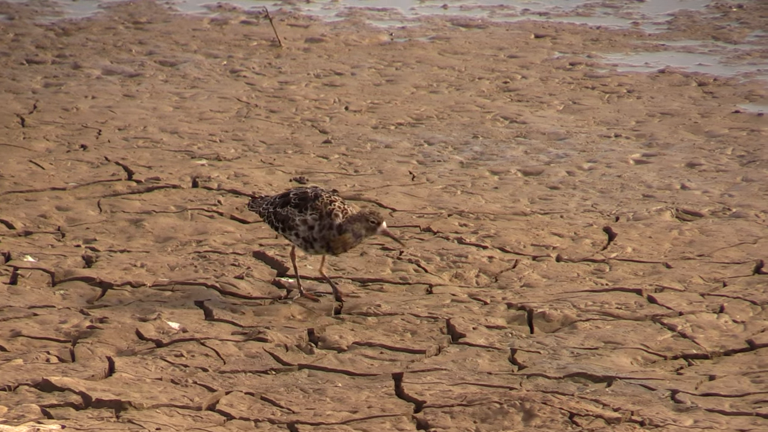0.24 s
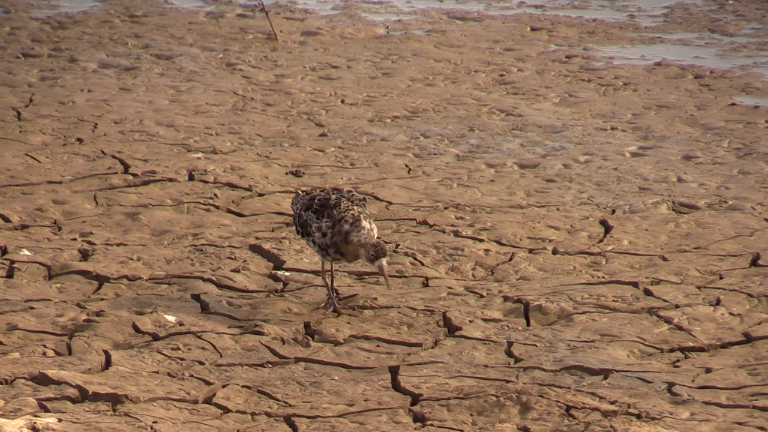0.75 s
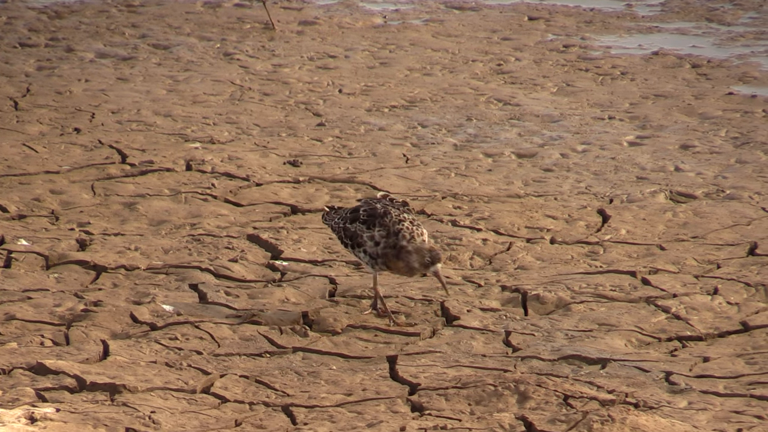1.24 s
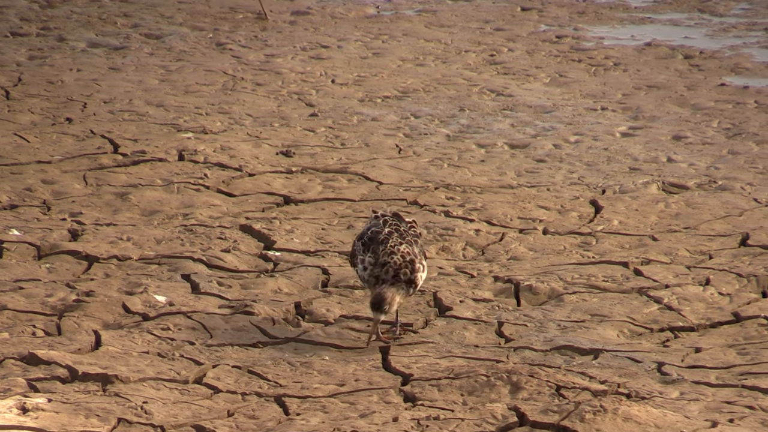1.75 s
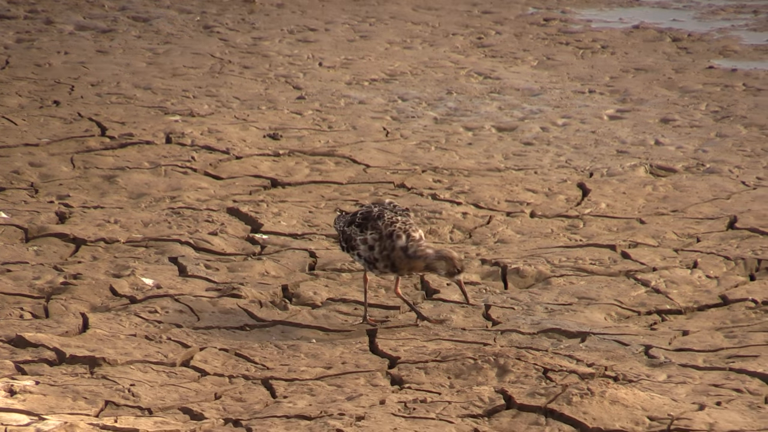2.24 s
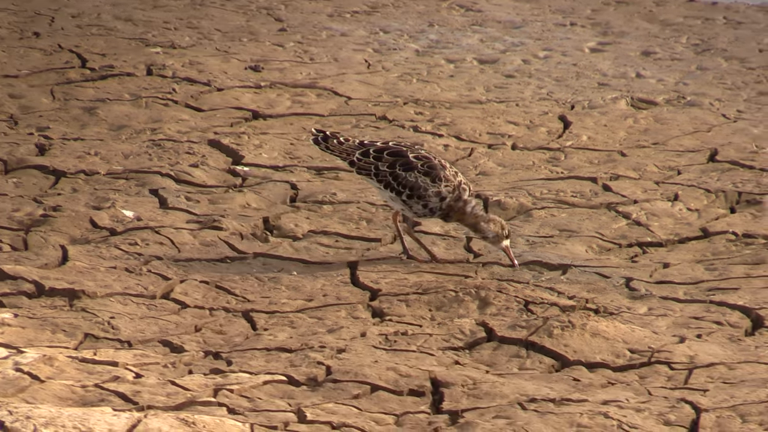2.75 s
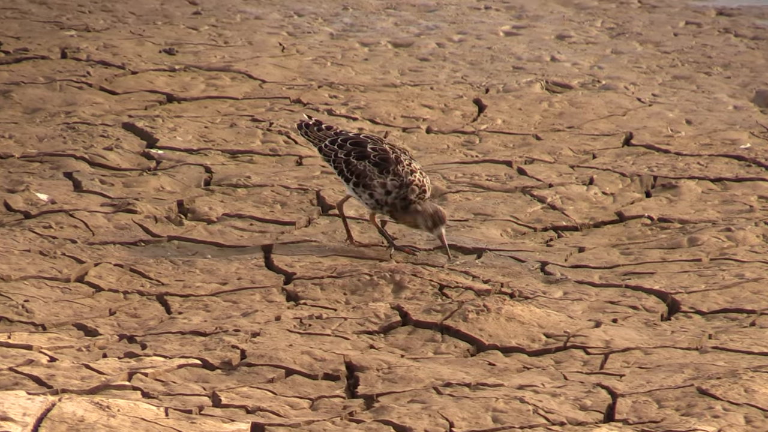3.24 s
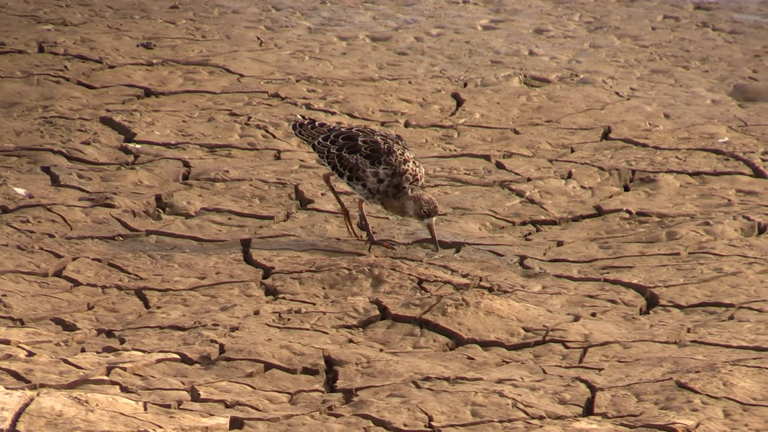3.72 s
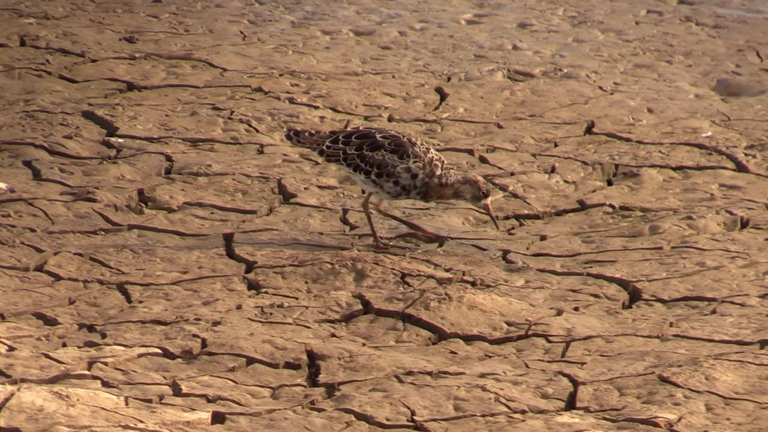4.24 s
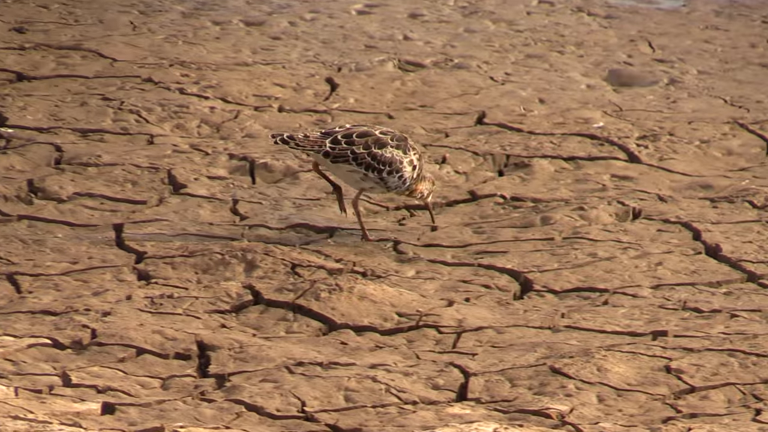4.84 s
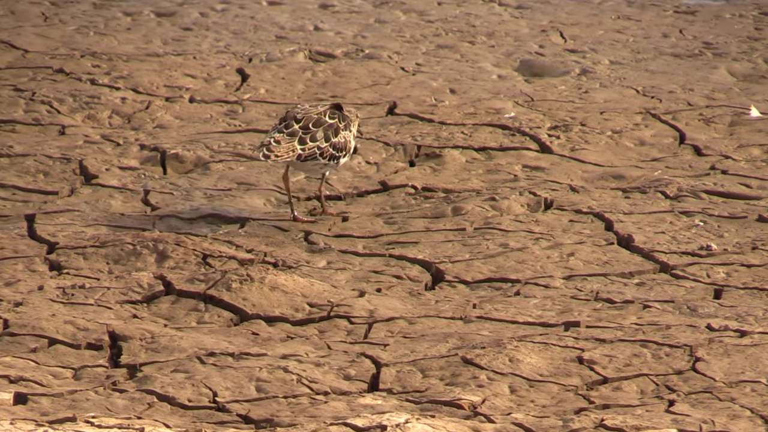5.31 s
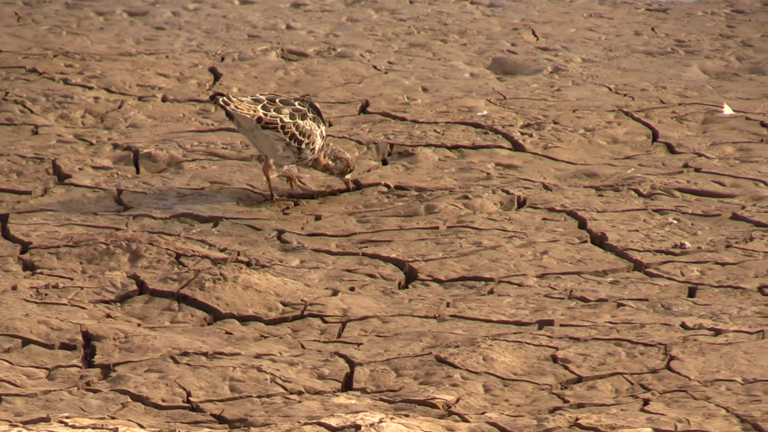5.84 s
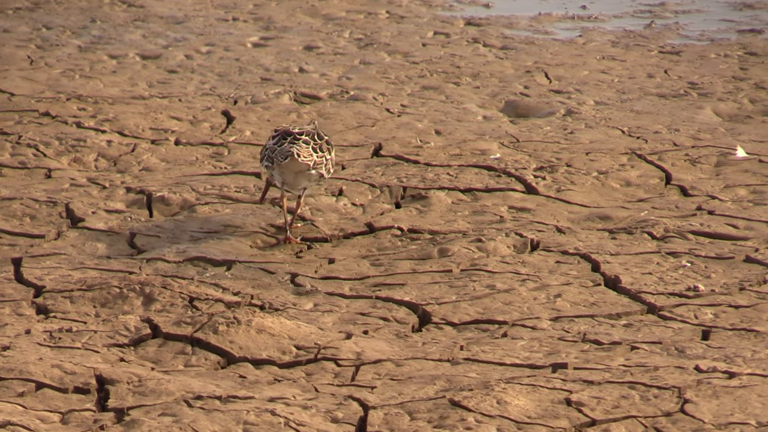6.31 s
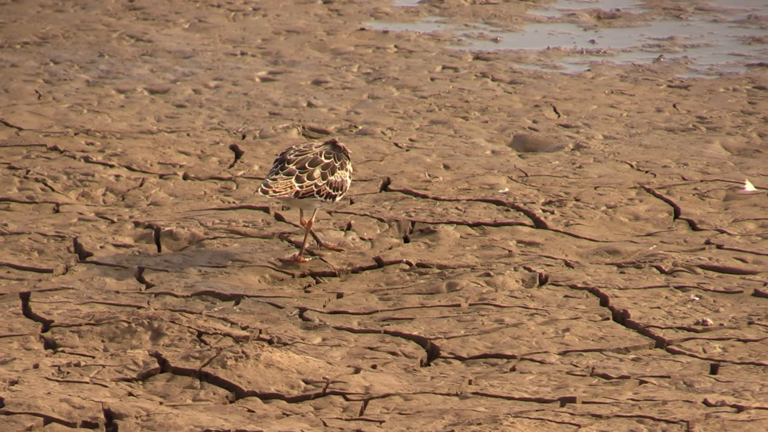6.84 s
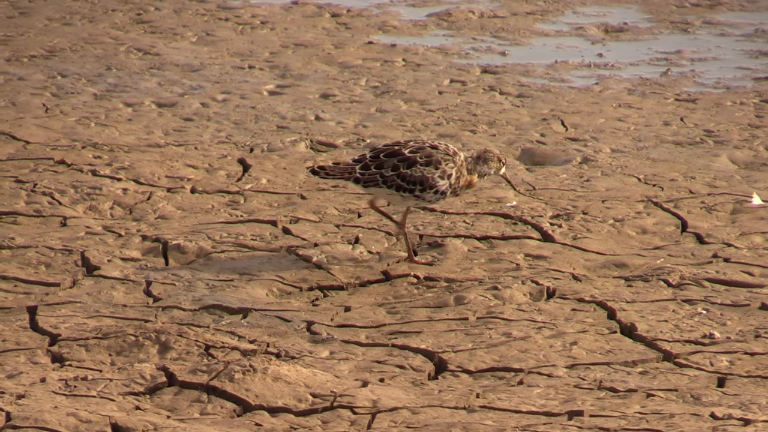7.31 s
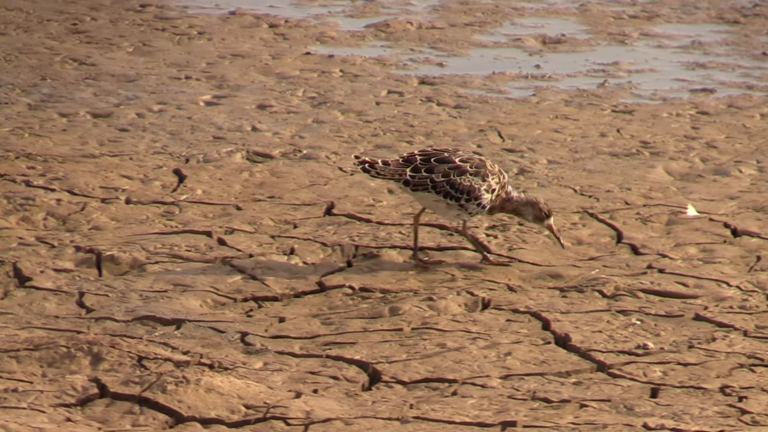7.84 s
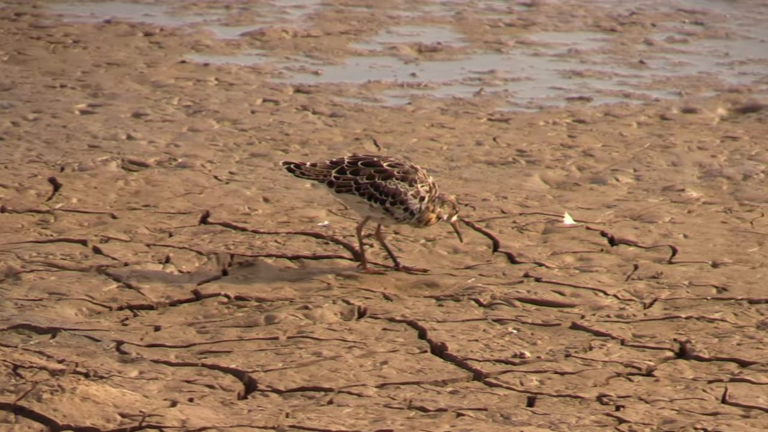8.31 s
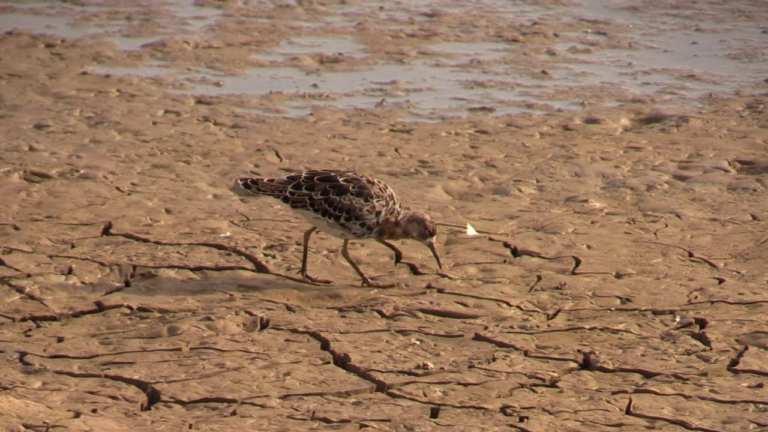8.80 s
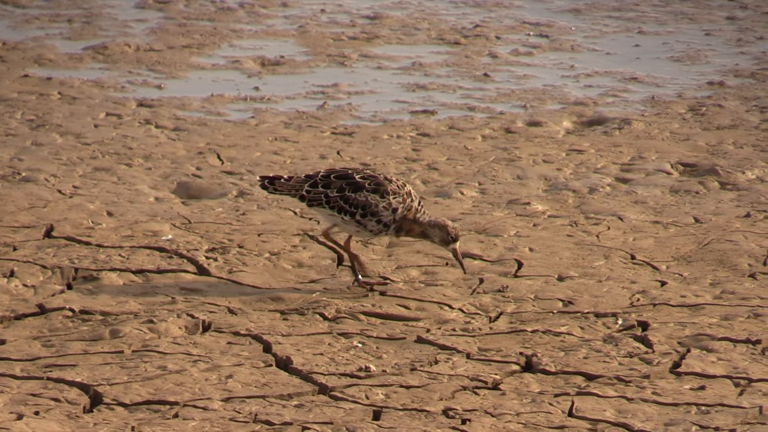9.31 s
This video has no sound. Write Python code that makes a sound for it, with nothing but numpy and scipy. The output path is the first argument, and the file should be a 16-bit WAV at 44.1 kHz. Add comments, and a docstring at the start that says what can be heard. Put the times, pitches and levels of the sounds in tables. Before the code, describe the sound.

Gulls call over an open marsh, single cries above a distant colony, while wind gusts rumble on the microphone.

```python
"""From the outset gulls call over an open marsh, single cries standing out of a far crowd and a hush of air.
Each cry is a pulse train near 1 kHz, chopped into throbs, clear or hoarse, filtered by throat and beak;
mud and reeds return dull echoes. Thin high rattles join in during the first three seconds.
Gusts rumble on the microphone; near 1.6 s and 3.1 s the strongest overload it with thin clicks.
Weaker gusts follow, and the colony calls on to the end."""
import sys
import numpy as np
from scipy import signal
from scipy.fft import rfft, irfft
from scipy.io import wavfile
from scipy.ndimage import uniform_filter1d

SR = 44100
rng = np.random.default_rng(int(sys.argv[2]) if len(sys.argv) > 2 else 0)


def int16_out(signal):
    """Quantize to a 16-bit WAV file."""
    q = np.round(np.clip(np.atleast_2d(signal).T, -1, 1) * 32767)
    wavfile.write(sys.argv[1], SR, q.astype(np.int16))


N = 421596

# Single cries. Each row: start in seconds, length in seconds, kind of voice, pitch at start, middle and
# end in Hz, throbs per second, throb depth from 0 to 1, throat level in dB, beak and treble levels in dB
# over the throat, beak resonance in Hz.
GULL_CRIES = [(0.0, 0.017, "hoarse", 862, 833, 868, 76, 0.4, -36, 6, -19, 3200),
              (0.124, 0.061, "rough", 866, 849, 816, 104, 0.46, -32, 5.5, -16, 3250),
              (0.202, 0.51, "hoarse", 886, 910, 868, 60, 0.6, -48, 7.5, -27, 3440),
              (0.42, 0.24, "harsh", 806, 854, 795, 88, 0.6, -37, -6, -31, 3000),
              (0.494, 0.27, "rough", 1002, 1111, 1033, 110, 1, -37, -20, -44, 2400),
              (0.707, 0.061, "hoarse", 812, 815, 780, 110, 0.26, -35.5, 6, -20, 3100),
              (0.848, 0.38, "reedy", 910, 967, 973, 65, 0.18, -44, -2, -41, 3230),
              (0.84, 0.23, "hoarse", 800, 830, 789, 42, 0.1, -38.5, -11, -44.5, 3550),
              (1.125, 0.15, "clear", 734, 875, 864, 53, 0.7, -37.5, -27, -43, 3640),
              (1.189, 0.089, "reedy", 894, 956, 993, 54, 0.6, -49, 2, -34, 3500),
              (1.259, 0.18, "clear", 875, 842, 786, 55, 0.4, -45.5, -28, -38, 3620),
              (1.504, 0.062, "rough", 855, 832, 774, 100, 0.35, -35.5, 2, -25.5, 3340),
              (1.745, .09, "clear", 854, 1038, 985, 50, 0.5, -44.5, -10, -40, 4100),
              (1.823, 0.14, "clear", 968, 903, 827, 53, 0.55, -38, -11, -37, 3460),
              (1.95, 0.0744, "rough", 838, 792, 765, 91, 0.5, -41, -3.5, -23.5, 3320),
              (2, 0.34, "rough", 808, 782, 836, 69, 0.57, -46, -34, -34, 3580),
              (2.159, 0.064, "split", 952, 1013, 956, 37, .1, -46, -10, -37, 2750),
              (2.345, 0.19, "harsh", 907, 925, 887.7, 64, 0.72, -53.5, 11.5, -37, 2900),
              (2.607, 0.062, "reedy", 967, 958, 950, 26, 0.47, -44.5, -2, -48, 3720),
              (2.791, 0.28, "harsh", 902, 939, 897, 51, 0.77, -57, 12.5, -51.5, 3910),
              (3.177, 0.084, "hoarse", 996, 1013, 1025, 61, 1, -60, 12.5, -37.5, 3030),
              (3.254, 0.31, "reedy", 948, 1029, 897, 58, 0.5, -45.5, -8, -50, 3570),
              (3.316, 0.18, "raspy", 793, 803, 816, 76, 1, -50, 8.5, -45, 3030),
              (3.711, 0.11, "clear", 801, 933, 834, 44, 0.8, -41.5, -10, -35, 2720),
              (3.827, 0.16, "clear", 745, 648, 539, 35, 0.9, -43.5, -14, -34, 3600),
              (4.02, 0.057, "reedy", 955, 1075, 1110, 59, 0.8, -57, 12, -35, 3300),
              (4.062, 0.099, "reedy", 1073, 1030, 978, 85, .9, -46.5, 1.5, -40, 3150),
              (4.086, 0.15, "clear", 972, 1156, 990, 64, 0.4, -42.5, -16, -30, 4760),
              (4.088, 0.25, "reedy", 966, 997, 911, 67, 0.6, -47, -4.5, -33, 3700),
              (4.414, 0.14, "split", 1027, 1003, 855, 80, 0.25, -40, -9, -33, 2910),
              (4.554, 0.095, "reedy", 968, 1027, 1001, 47, 0.54, -44.5, -9, -30, 3900),
              (4.654, 0.14, "clear", 968, 903, 904, 51, 0.2, -38.5, -19, -39, 3900),
              (4.82, 0.11, "trill", 933, 920, 937, 44, 0.67, -42.5, -2.5, -51, 3600),
              (4.891, 0.063, "clear", 905, 830, 740, 47, .5, -47, -20, -40, 3000),
              (4.929, 0.042, "clear", 1140, 1084, 1040, 37, 0.7, -47, -20, -35, 3850),
              (4.982, 0.11, "clear", 981, 987, 942, 49, 0.9, -50, -5, -32, 3870),
              (5.069, 0.068, "reedy", 894, 818, 760, 35, 0.4, -59, -18, -40, 3000),
              (5.098, 0.11, "clear", 1020, 962, 937, 42, 0.8, -56, 4, -34, 3820),
              (5.101, 0.09, "clear", 1000, 1070, 1050, 44, 0.7, -65, -6, -15, 5170),
              (5.278, 0.14, "rough", 1050, 1130, 1120, 74.4, 0.54, -49, -1, -28, 2830),
              (5.298, 0.19, "rough", 892, 905, 867, 42, 0.5, -42.5, -7, -31, 3850),
              (5.371, .13, "harsh", 1115, 1170, 1116, 68, 0.7, -41, 3, -27, 3330),
              (5.532, 0.075, "clear", 888, 960, 985, 26, 0.1, -48, -16, -35, 3000),
              (5.565, 0.097, "reedy", 903, 1072, 970, 52, 0.3, -43.5, -7, -29, 4170),
              (5.765, 0.14, "trill", 953, 919, 895, 41, 0.64, -37.5, -0.5, -34, 4030),
              (5.915, 0.069, "rough", 1140, 1130, 1060, 55, 0.76, -41, -8, -28, 4440),
              (5.915, 0.14, "raspy", 1130, 1020, 828, 62, 0.6, -43.5, -9.5, -31, 4050),
              (6.101, 0.2, "hoarse", 996, 1063, 1012, 62, 0.7, -40, 2, -27.5, 3180),
              (6.3, 0.11, "hoarse", 945, 935, 936, 56, 0.4, -43, 1, -46, 3650),
              (6.393, 0.13, "raspy", 946, 893, 792, 66, 0.93, -39, 2.5, -45, 2700),
              (6.422, 0.15, "raspy", 896, 860, 828, 51, 0.9, -53, 5.5, -40, 3400),
              (6.56, 0.081, "reedy", 928, 1055, 977, 70, 0.2, -47, -22.5, -30, 3760),
              (6.642, 0.13, "clear", 982, 938, 834, 110, 0.34, -41.5, -19, -32, 2780),
              (6.801, 0.12, "raspy", 870, 923, 928, 72, 0.5, -40.5, -0.5, -30, 2890),
              (6.881, 0.16, "reedy", 1010, 1067, 983, 60, 0.34, -44, -6, -30, 2980),
              (6.921, 0.09, "clear", 933, 897, 860, 55, 0.6, -41.5, -17, -32, 3600),
              (7.049, 0.13, "clear", 963, 923, 880, 38, 0.5, -44.5, -10, -35, 4380),
              (7.148, 0.13, "reedy", 943, 948, 948, 71, 1, -49.5, 5, -41, 3250),
              (7.303, 0.09, "split", 1010, 990, 900, 63, .1, -42.5, -22, -38, 2930),
              (7.455, 0.11, "clear", 940, 935, 922, 59, 0.29, -43.5, -7, -29, 3700),
              (7.541, 0.16, "harsh", 797.6, 801, 800, 53, 0.72, -41, -3, -24, 3420),
              (7.714, 0.14, "hoarse", 1050, 1082, 1060, 54, 0.1, -50, -17, -19, 2220),
              (8.106, 0.11, "harsh", 987, 1002, 1006, 57, 0.5, -57.5, 13, -18, 2600),
              (8.247, 0.16, "hoarse", 1001, 1037, 1000, 60, 0.66, -37.5, -4.5, -31.5, 3520),
              (8.375, 0.19, "reedy", 959, 915, 872, 58, .5, -39.5, -12, -32, 3870),
              (8.886, 0.24, "rough", 870, 988, 935, 72, 0.58, -38, -8, -33, 3520),
              (9.113, 0.081, "rough", 1096, 1120, 1110, 40, 0.4, -46, -13, -27, 4100),
              (9.189, 0.084, "reedy", 1110, 1100, 1070, 45, 0.3, -62, 3, -30, 4400),
              (9.28, 0.057, "reedy", 658, 688, 730, 103, 0.5, -40, -8, -29, 4470),
              (9.305, 0.18, "burry", 850, 946, 860, 85, 0.6, -29.5, -5, -33, 4270),
              (9.468, 0.066, "reedy", 735, 682, 655, 83, 0.4, -35.5, -5, -29, 4030)]
# Kinds of voice. Each entry: hoarseness from 0 to 1, half-pitch modulation from 0 to 1, level of the
# resonance at the third partial in dB over the throat.
VOICE_KINDS = {"trill": (.1, 0, -5), "split": (.06, .5, -8), "clear": (.1, 0, -13), "reedy": (.18, 0, -14),
               "burry": (.27, 0, -18), "raspy": (.3, 0, -12), "rough": (.45, 0, -9), "hoarse": (.6, 0, -9),
               "harsh": (.7, 0, -7)}
# Loudness of the far crowd. Each row: time in seconds, throat level in dB.
CROWD_LEVEL = [(0.0, -30.5), (.2, -40.5), (.55, -30.5), (.98, -43), (1.62, -41), (2.26, -46.5), (2.77, -41),
               (3.15, -47.5), (3.5, -45), (4.1, -47), (4.25, -54.5), (4.7, -40), (5.35, -45), (5.52, -55.5),
               (5.72, -37.5), (5.86, -33), (6.07, -44.5), (6.25, -38), (7.19, -40.5), (7.64, -37.5),
               (8.15, -44), (8.49, -41.5), (8.84, -44), (9.56, -38)]
# Spectrum of the open air's hush. Each row: frequency in Hz, relative spectral density in dB.
HUSH_SPECTRUM = [(30, 2), (100, 4.5), (200, 0.5), (400, -0.5), (800, -1), (1500, 2.5), (3000, -4),
                 (5000, -17), (7500, -34), (11000, -37.5), (15700, -37)]
# Loudness of the hush. Each row: time in seconds, level in dB.
HUSH_LEVEL = [(0, -38.5), (1.4, -41), (1.8, -47.5), (3.6, -46.5), (4.5, -48), (5.5, -45.5), (6.5, -44),
              (8.2, -42.5), (9.56, -41)]
# Gusts. Each row: arrival in seconds, hold in seconds, rumble level in dB, flutter level in dB over the
# rumble, decay of the rumble in dB per second.
GUSTS = [(0.585, .015, -44, -10, 130), (0.03, .02, -50.5, -11, 40), (1.125, 0.14, -44, -15, 100),
         (1.304, 0.12, -44, -6, 99.5), (1.436, 0.018, -32, -18, 500), (1.582, 0.074, -12, -7, 163),
         (1.807, 0.18, -31, -28, 147), (2.119, 0.18, -22, -17, 252), (2.343, 0.014, -32, -32, 26),
         (2.735, 0.019, -47, -24.5, 200), (3.033, 0.012, -28, -23, 300), (3.112, 0.045, -20, -7, 134),
         (3.354, 0.1, -41.5, -7, 82), (3.97, 0.21, -36, -33, 49), (4.893, 0.032, -22, -9, 185),
         (5.026, 0.018, -24.5, -9, 296), (5.182, 0.054, -43, -10, 150), (5.366, .015, -45.5, -18.5, 140),
         (6.452, .03, -34, -29.5, 200), (6.556, 0.026, -35.5, -24, 350), (6.798, .015, -46, -20, 60),
         (7.009, 0.023, -34, -25, 85), (7.204, 0.26, -44, -27, 400), (7.59, .015, -42, -22, 100),
         (7.75, 0.0083, -38, -20.5, 250), (8.007, 0.17, -47, -26, 100), (8.27, 0.12, -38, -5.5, 150),
         (8.81, .015, -43.5, -6, 53), (9.45, .015, -55, -6, 50)]
# Reflections from mud and reeds. Each row: delay in seconds, gain in dB.
MARSH_ECHOES = [(0.009, -14.5), (0.028, -17.5), (0.048, -23.5), (0.085, -18)]
# Thin rattles. Each row: start in seconds, length in seconds, centre frequency in Hz, width in Hz,
# level in dB, throbs per second.
HIGH_RATTLES = [(0.046, 0.081, 8100, 900, -54, 51), (0.19, 0.25, 6250, 400, -60, 63),
                (.275, .035, 8100, 500, -64, 54), (0.334, 0.18, 8000, 600, -56, 60),
                (.37, .06, 10000, 1800, -69, 63), (0.455, 0.11, 8620, 2190, -52.5, 56),
                (0.425, 0.14, 5870, 1500, -46, 63), (0.62, 0.053, 8600, 1800, -53, 62),
                (0.895, 0.036, 8840, 1960, -66, 62), (1.02, 0.078, 10900, 1200, -75, 60),
                (1.055, 0.29, 7000, 2500, -64, 47), (1.111, 0.11, 5810, 450, -53, 60),
                (1.112, 0.1, 8100, 900, -59, 60), (1.302, 0.15, 5640, 890, -57, 60),
                (2.367, 0.091, 6000, 2530, -67, 64), (2.79, 0.19, 6330, 2200, -62, 83)]
# Clicks of the overloaded microphone. Each row: time in seconds, peak before filtering in dB.
OVERLOAD_CLICKS = [(1.591, -38), (1.600, -22), (1.605, -33), (1.609, -30), (1.628, -42), (1.644, -28),
                   (1.650, -27), (3.161, -28), (3.166, -30)]

THROAT_WIDTH_HZ, BEAK_WIDTH_HZ, BEAK_EDGE_HZ = 750, 1050, 5330
TREBLE_HZ, TREBLE_FADE_HZ = 4300, 8700
FUNDAMENTAL_DB, CROWD_BEAK_DB = -15, -10.5   # over the throat
BREEZE_RUMBLE_DB, BREEZE_FLUTTER_DB, LUMPS_DB, LUMPS_PER_S = -59, -52.5, 2.5, 30
GUST_RISE_DB_PER_S, FLUTTER_DECAY_RATIO = 320, 2.3


def from_db(db):
    """Amplitude grows tenfold for every 20 dB."""
    return 10 ** (np.asarray(db) / 20)


def rms_one(x):
    """Normalisation to unit mean power."""
    return x / np.sqrt(np.mean(x ** 2) + 1e-20)


def in_time(rows):
    """Linear interpolation: each column after the time becomes a curve, sample by sample."""
    times, *columns = np.transpose(rows)
    return [np.interp(np.arange(N) / SR, times, column) for column in columns]


def butter(x, hz, kind, order):
    """A Butterworth filter, maximally flat in its passband."""
    return signal.sosfilt(signal.butter(order, hz, kind, fs=SR, output="sos"), x)


def resonance(x, hz, width_hz):
    """Two equal resonators in cascade give a peak with steep skirts; the output has rms 1."""
    radius = np.exp(-np.pi * width_hz / SR)
    section = [1, 0, -1, 1, -2 * radius * np.cos(2 * np.pi * hz / SR), radius * radius]
    return rms_one(signal.sosfilt([section, section], x))


def wander(size, hz):
    """Random drift: Gaussian values, hz of them a second, joined by straight lines."""
    knots = rng.standard_normal(int(size * hz / SR) + 2)
    return np.interp(np.arange(size) * hz / SR, np.arange(len(knots)), knots)


def syrinx(length, pitches_hz, throbs_per_s, depth, hoarse, half_pitch):
    """A pulse source, made hoarse by jitter, shimmer and breath. Returns the voice and its envelope."""
    size = int(length * SR)
    progress = np.arange(size) / size
    arch_hz = np.polyval(np.polyfit([0, .5, 1], pitches_hz, 2), progress)
    throb_phase = 2 * np.pi * np.cumsum(throbs_per_s * (1 + .015 * wander(size, 25))) / SR
    # the pitch climbs out of the gap of each throb
    dip = (.012 + .2 * min(hoarse, .18)) * depth * np.cos(throb_phase - 2.5 * min(hoarse, .25))
    jitter = (.008 + .04 * hoarse + .16 * hoarse ** 2) * wander(size, 350)
    phase = 2 * np.pi * np.cumsum(arch_hz * (1 - dip + jitter)) / SR
    pulses = np.exp(45 * (np.cos(phase) - 1))
    pulses *= 1 + half_pitch * np.cos(phase / 2)   # strong and weak pulses alternate
    pulses *= 1 + hoarse * wander(size, 900)   # shimmer
    breath = rng.standard_normal(size) * (1 + np.cos(phase))
    voice = rms_one(pulses - pulses.mean()) + 1.7 * hoarse ** 2 * rms_one(breath)
    gate = 1 - np.clip(depth, 0, 1) * np.clip(.55 + np.cos(throb_phase), 0, 1)   # pinched once a throb
    # clear cries start and stop abruptly, hoarse ones swell
    swell = np.clip(np.minimum(progress, 1 - progress) / (.04 + .7 * hoarse), 0, 1)
    return voice, rms_one(gate * np.sin(np.pi / 2 * swell))


def cries():
    """Source and filter: throat and beak resonances colour the pulses, the throat near partial two."""
    out = np.zeros(N + SR)
    for start, length, kind, *pitches, throbs, depth, throat_db, beak_db, treble_db, beak_hz in GULL_CRIES:
        hoarse, half_pitch, third_db = VOICE_KINDS[kind]
        voice, envelope = syrinx(length, pitches, throbs, depth, hoarse, half_pitch)
        middle_hz = pitches[1]
        airy = voice + .6 * rng.standard_normal(len(voice))   # breath veils the highest partials
        treble = butter(butter(airy, TREBLE_HZ, "high", order=4), TREBLE_FADE_HZ, "low", order=1)
        throat = resonance(voice, np.clip(2 * middle_hz, 1700, 2250), THROAT_WIDTH_HZ)
        # hoarse cries open the beak wider
        beak = from_db(beak_db) * resonance(voice, beak_hz, BEAK_WIDTH_HZ * (1 + .9 * hoarse))
        third = from_db(third_db) * resonance(voice, 3 * middle_hz, width_hz=740)
        fundamental = from_db(FUNDAMENTAL_DB) * resonance(voice, middle_hz, width_hz=200)
        cry = butter(throat + beak - third + fundamental, BEAK_EDGE_HZ, "low", order=4)
        cry += from_db(treble_db) * rms_one(treble)
        at = int(start * SR)
        out[at:at + len(cry)] += from_db(throat_db) * envelope * cry
    return out[:N]


def crowd(count):
    """Superposition: far cries at random moments, pitches and distances merge into a babble."""
    babble = np.zeros(N + 2 * SR)
    for k, (when, long, high, bend, fast, depth, rough, far) in enumerate(rng.random((count, 8))):
        pitches_hz = (740 + 400 * high) * np.array([.88 + .2 * bend, 1.03, .9])
        voice, envelope = syrinx(.06 + .16 * long, pitches_hz, throbs_per_s=45 + 45 * fast,
                                 depth=depth, hoarse=.17 + .45 * rough, half_pitch=0)
        at = int((k + 3 * when) / count * (N + SR // 2))   # spread evenly, so no long silence falls
        babble[at:at + len(voice)] += from_db(-8 * far) * envelope * voice
    babble = babble[SR // 2:N + SR // 2]
    babble /= (uniform_filter1d(babble ** 2, SR // 8) + 1e-9) ** .4   # partly levelled; lulls remain
    babble = butter(babble, 1300, "high", order=2)   # the weak first partials are lost over the distance
    throat = resonance(babble, hz=1720, width_hz=800)
    beak = butter(resonance(babble, hz=3790, width_hz=1900), BEAK_EDGE_HZ, "low", order=4)
    throat_db, = in_time(CROWD_LEVEL)
    return from_db(throat_db) * (throat + from_db(CROWD_BEAK_DB) * beak)


def air():
    """Spectral shaping turns white noise into the smooth hush of open air."""
    hz, db = np.transpose(HUSH_SPECTRUM)
    bins_hz = np.maximum(np.arange(N // 2 + 1) * SR / N, 1)
    shape = from_db(np.interp(np.log(bins_hz), np.log(hz), db))
    hush = irfft(rfft(rng.standard_normal(N)) * shape, N)
    level_db, = in_time(HUSH_LEVEL)
    return from_db(level_db) * rms_one(hush)


def gust_gains():
    """Powers add: a steady breeze plus gusts that rise, hold and decay give rumble and flutter gains."""
    t = np.arange(0, N / SR + .01, .002)
    rumble_power, flutter_power = from_db(2 * BREEZE_RUMBLE_DB), from_db(2 * BREEZE_FLUTTER_DB)
    for arrival, hold, rumble_db, flutter_db, decay in GUSTS:
        onset_db = rumble_db - GUST_RISE_DB_PER_S * np.maximum(arrival - t, 0)
        fall_db = decay * np.maximum(t - arrival - hold, 0)
        rumble_power += from_db(2 * (onset_db - fall_db))
        flutter_power += from_db(2 * (onset_db + flutter_db - FLUTTER_DECAY_RATIO * fall_db))
    return in_time(np.transpose([t, np.sqrt(rumble_power), np.sqrt(flutter_power)]))


def wind():
    """Turbulence at the microphone is lumpy low noise; eddies add a faster flutter above it."""
    rumble_gain, flutter_gain = gust_gains()
    white = rng.standard_normal((2, N))
    rumble = butter(butter(white[0], 107, "low", order=2), 40.4, "high", order=2)
    flutter = butter(butter(white[1], 252, "low", order=2), 112, "high", order=2)
    lumps = from_db(LUMPS_DB * wander(N, LUMPS_PER_S))
    return lumps * (rumble_gain * rms_one(rumble) + flutter_gain * rms_one(flutter))


def marsh(direct):
    """Reflection: mud and reeds add a few delayed, dull copies to the direct sound."""
    dull = butter(direct, 3800, "low", order=1)
    return direct + sum(from_db(db) * np.pad(dull, (int(delay * SR), 0))[:N] for delay, db in MARSH_ECHOES)


def rattles():
    """Amplitude modulation chops the noise of a high resonance into bursts, one each throb."""
    out = np.zeros(N)
    for start, length, hz, width_hz, db, throbs_per_s in HIGH_RATTLES:
        t = np.arange(int(length * SR)) / SR
        bursts = np.sin(np.pi * throbs_per_s * t) ** 4 * np.sin(np.pi * t / length) ** .5
        hiss = resonance(rng.standard_normal(len(t)), hz, width_hz)
        at = int(start * SR)
        out[at:at + len(t)] += from_db(db) * bursts * hiss
    return out


def overload_clicks():
    """Overload of the microphone in the strongest gusts gives thin clicks: high-passed impulses."""
    impulses = np.zeros(N)
    for start, db in OVERLOAD_CLICKS:
        impulses[int(start * SR)] = from_db(db)
    return butter(impulses + 1e-18, 2500, "high", order=1)


def scene():
    """Sound pressures add in one channel: birds with their echoes, air, and wind at the microphone."""
    birds = cries() + rattles() + crowd(count=330)
    return (marsh(birds) + air() + wind() + overload_clicks())[None]


def record(dry, ceiling=.6, cutoff_hz=16250):
    """Soft saturation rounds the peaks, and a steep low-pass filter cuts the top."""
    rounded = ceiling * np.tanh(dry / ceiling)
    return signal.sosfilt(signal.cheby2(14, 70, cutoff_hz, fs=SR, output="sos"), rounded)


dry = scene()
out = record(dry)
int16_out(out)
```